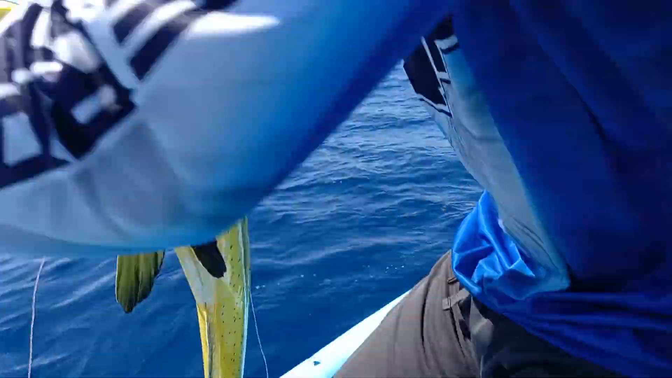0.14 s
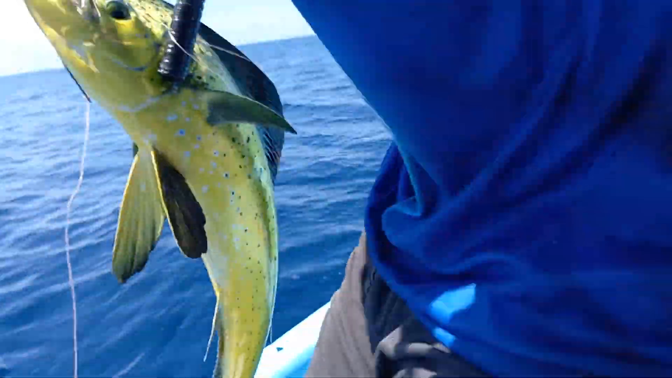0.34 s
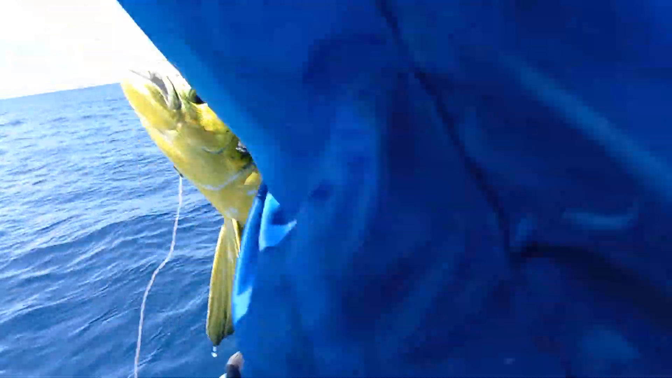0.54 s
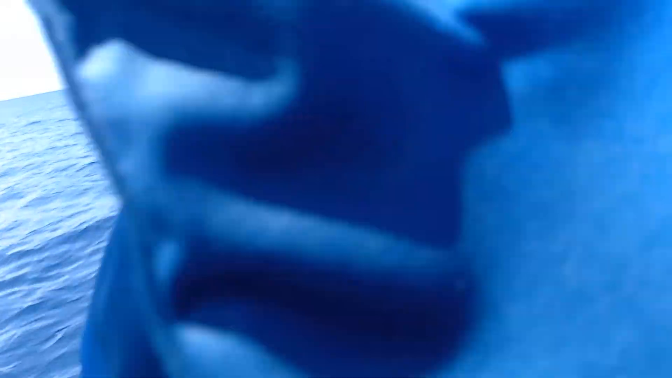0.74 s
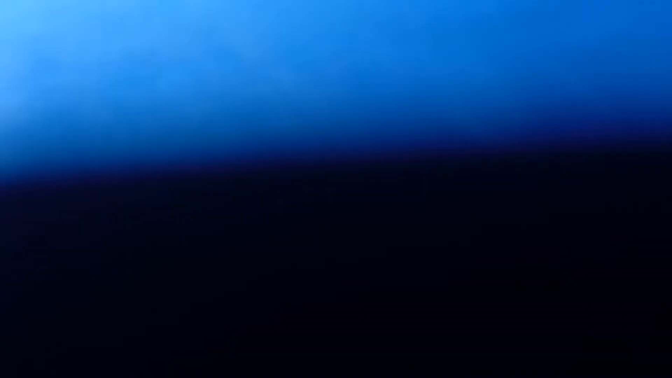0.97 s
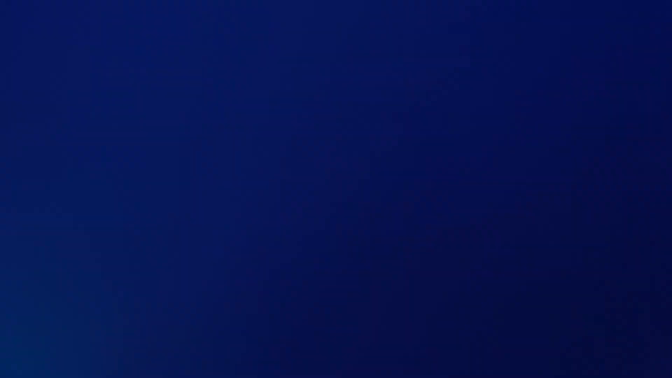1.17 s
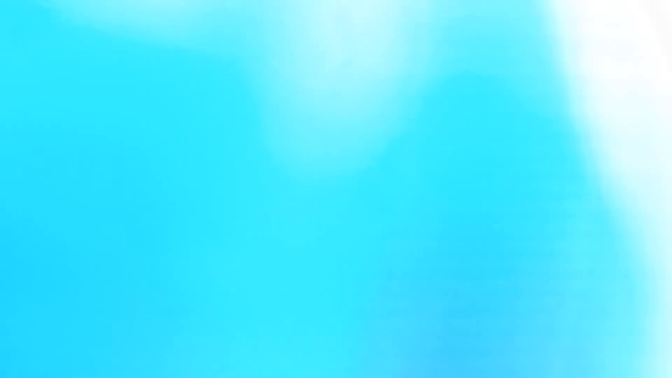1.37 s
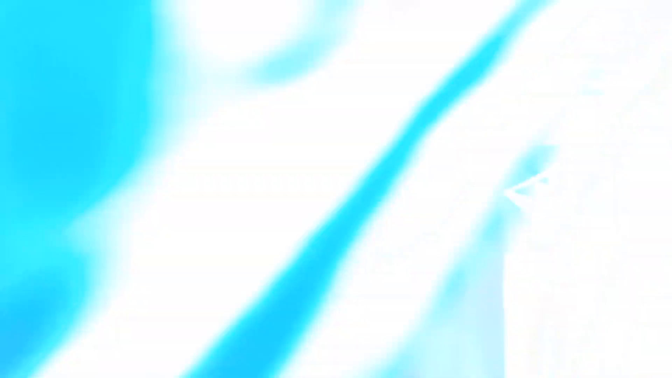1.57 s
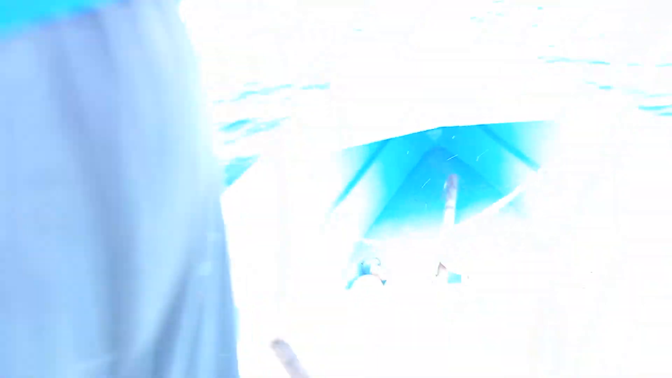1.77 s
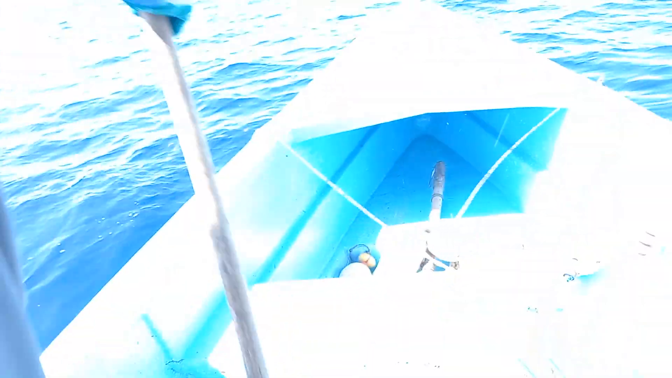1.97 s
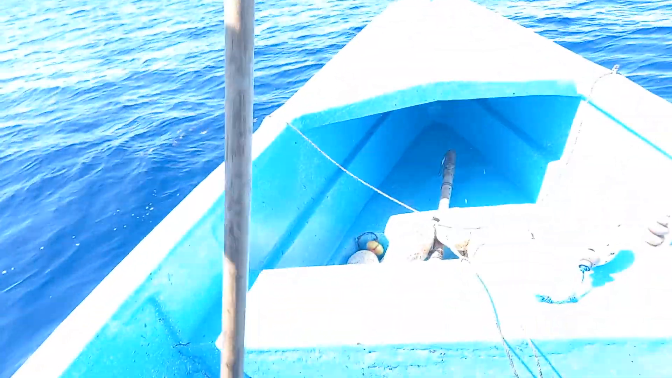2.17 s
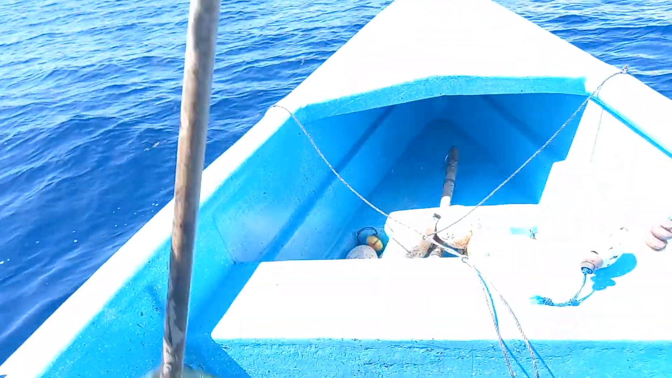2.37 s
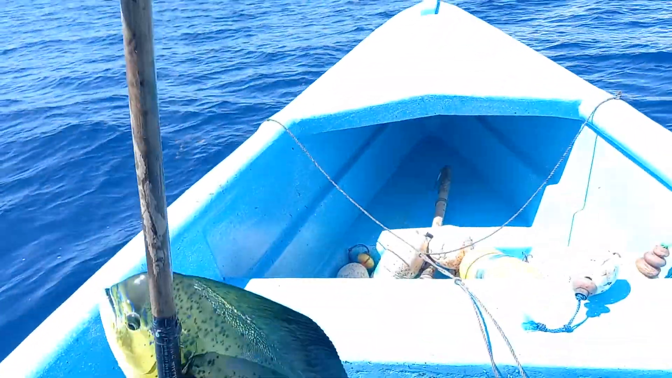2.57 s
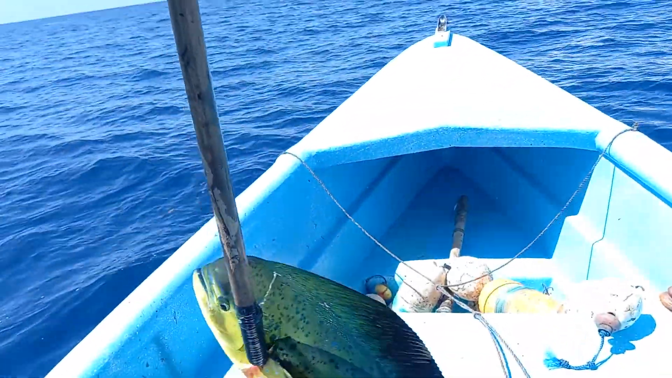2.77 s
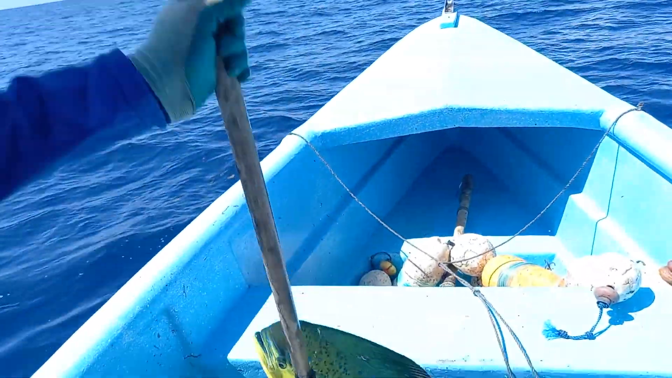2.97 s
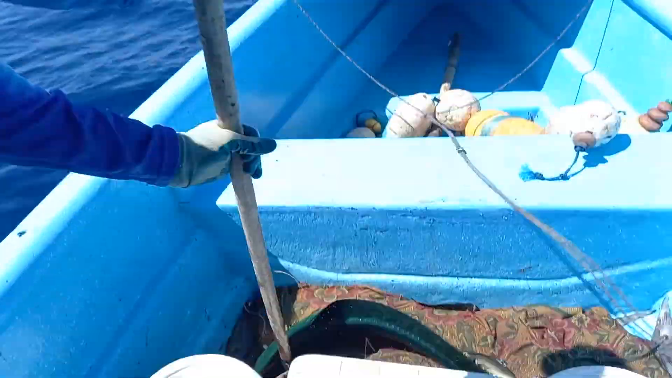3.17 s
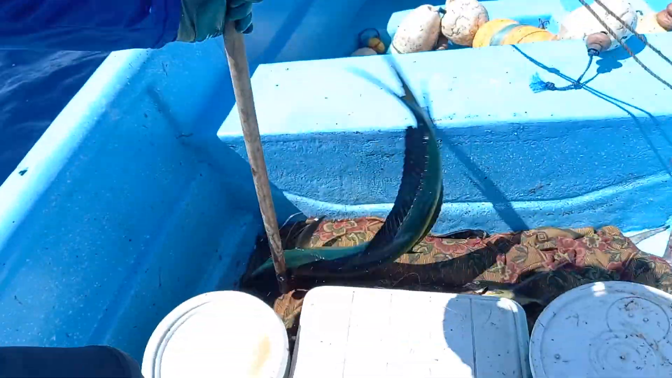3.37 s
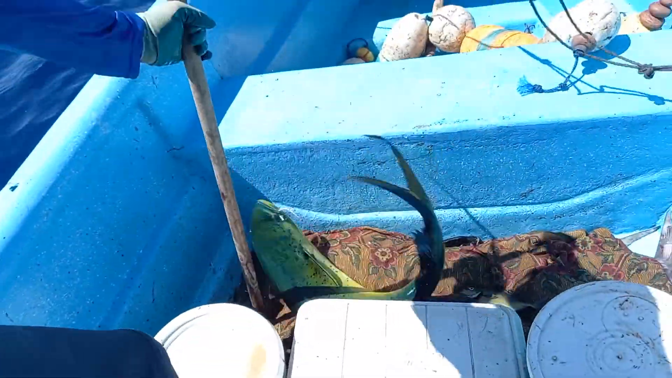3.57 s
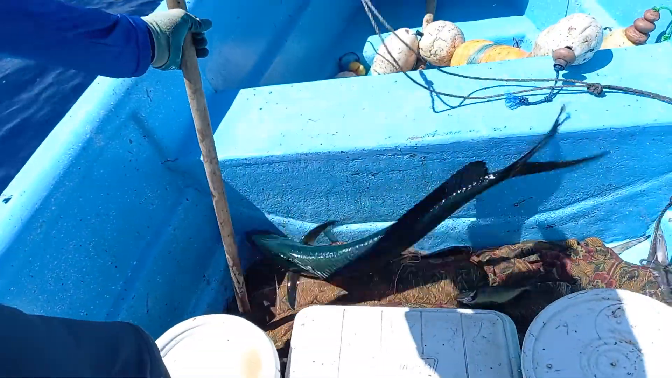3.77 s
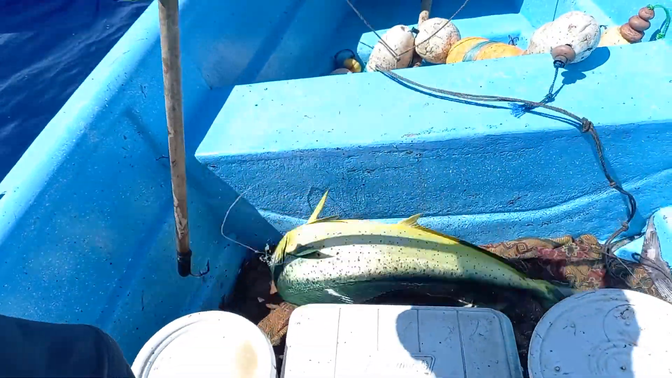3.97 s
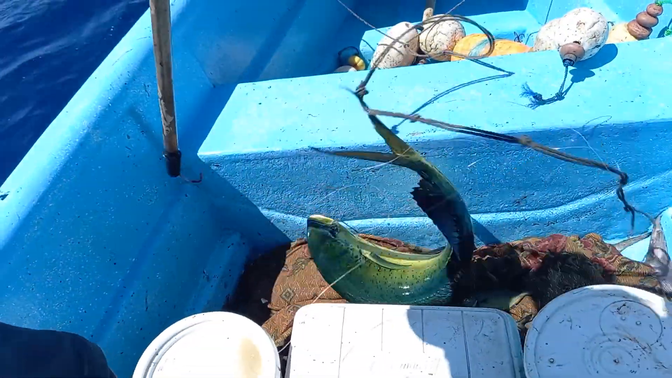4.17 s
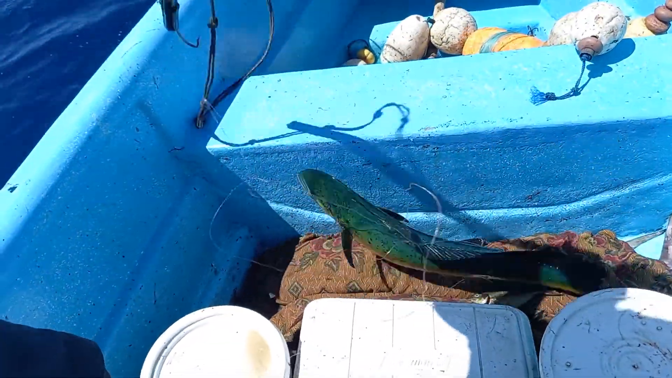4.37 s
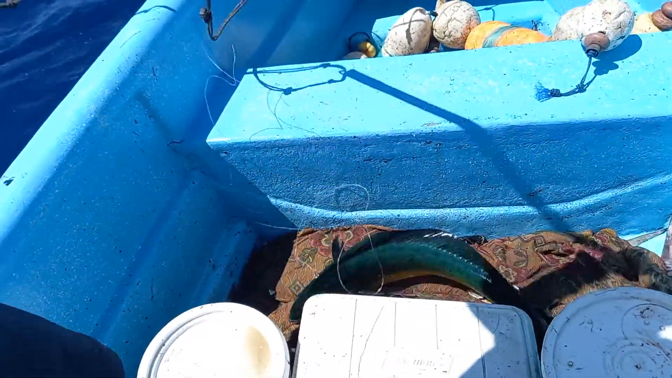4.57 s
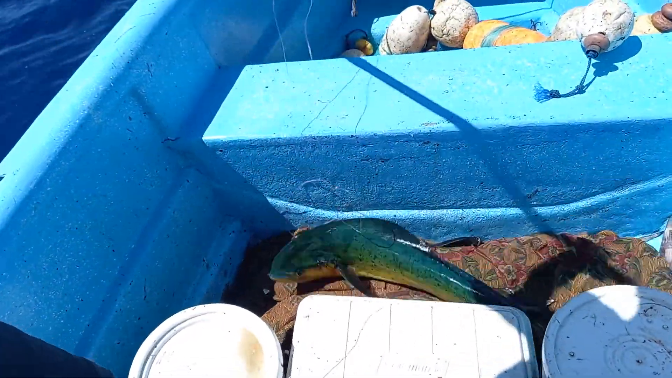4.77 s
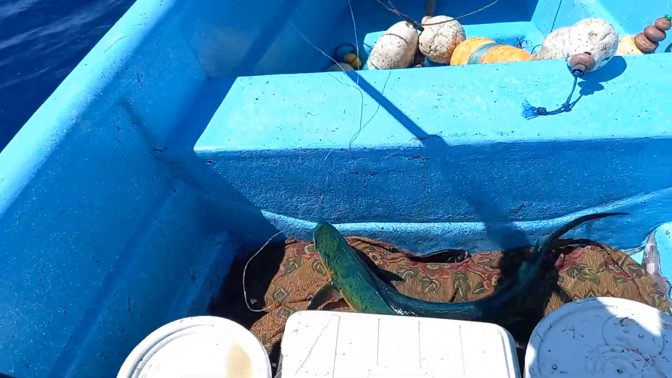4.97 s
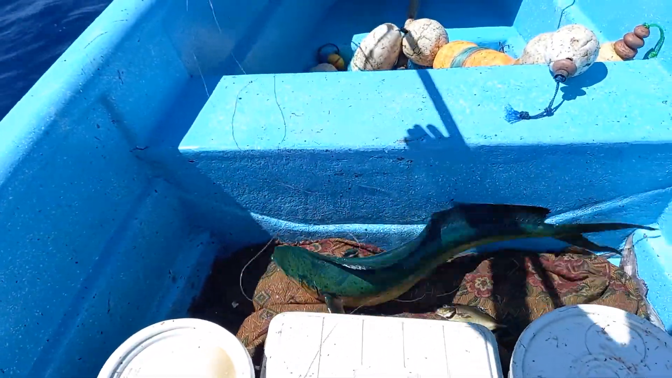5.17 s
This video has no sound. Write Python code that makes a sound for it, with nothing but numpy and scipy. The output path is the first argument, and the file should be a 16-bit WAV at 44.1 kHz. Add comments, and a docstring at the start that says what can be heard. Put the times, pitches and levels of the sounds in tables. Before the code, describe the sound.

A large fish is brought into a small open fibreglass boat, heard closely just ahead and slightly to the right. For the first second it is nearly quiet: faint hull rumble, light rustle and one weak slap with a knock near 0.3 s. At about 1.2 s a solid hollow knock lands, followed by scuffing sleeves and rope, cloth brushing the microphone and small wet slaps until 1.8 s. Low thumps and sharp slaps fall around 1.9-2.3 s, then lighter ones near 2.6-2.9 s over a soft rumble. From 3.1 s the fish thrashes hard: dense, irregular wet cracks of tail and flank, low floor booms and short ringing panel knocks, several per second, with fierce bursts around 3.5-4.0 s. After a slight easing near 4.1-4.2 s, strong blows resume from 4.4 s until the end, past 5.2 s, with slithering, wet crackle and hull shudder between them.

```python
"""In a small open fibreglass boat, a big fish is hauled over the side and thrashes on the floor.
Wet slaps of skin and tail are bursts of flickering noise with a short ring of trapped air.
The body's blows make the hull boom and the side panels ring: sums of dying sine waves.
Around the blows, coloured noise makes the hull rumble, sleeves and rope rub, clothes rustle by
the microphone and the fish slither and crackle wetly on a mat."""
import sys
import numpy as np
from scipy import signal
from scipy.fft import rfft, irfft
from scipy.io import wavfile
from scipy.ndimage import uniform_filter1d

SR = 44100
rng = np.random.default_rng(int(sys.argv[2]) if len(sys.argv) > 2 else 0)


def int16_out(signal):
    """Quantize to a 16-bit WAV file."""
    q = np.round(np.clip(np.atleast_2d(signal).T, -1, 1) * 32767)
    wavfile.write(sys.argv[1], SR, q.astype(np.int16))


N = 231014

# Levels in these tables are starting points: the functions add fixed trims in dB when they mix.
# Hauling the fish aboard, joined by straight lines:
# (time [s], hull rumble level [dB], rubbing level [dB], rustle level [dB])
HAULING = [(0.0, -50, -55.5, -65), (0.13, -60, -67, -66), (0.38, -94, -60, -75), (0.52, -59.5, -103, -67),
           (1.06, -59.5, -56.5, -64), (1.21, -57, -32, -57), (1.31, -63, -36, -43), (1.38, -58, -35.5, -79),
           (1.51, -47.5, -35.5, -49), (1.62, -76, -40.5, -44), (1.75, -48, -27.5, -50.5),
           (1.9, -40.5, -42, -50), (2.06, -41, -29.5, -48), (2.2, -44, -80, -61), (2.45, -67, -45, -67),
           (2.71, -38.5, -58, -53), (2.88, -47, -63, -57), (3.08, -81, -53, -55.5)]
# Colours of the movement noises: (frequency [Hz], level [dB])
RUMBLE_COLOUR = [(15, -5), (40, -35.5), (62, 5), (84, 6.5), (130, -1.5), (200, -11), (900, -44)]
RUBBING_COLOUR = [(100, -19.5), (220, -8), (330, 2), (500, -0.5), (750, -11), (1400, -24), (2500, -27.5),
                  (6000, -91)]
RUSTLE_COLOUR = [(500, -15), (1200, 11.5), (2200, 2.5), (4000, 4), (6500, 4), (12000, -0.5), (16000, -1.5)]
# Clothes sweep across the microphone: (time [s], level [dB], length [s])
CLOTH_SWEEPS = [(0.62, -58, .2), (1.003, -52, .15), (1.225, -38, .035), (1.295, -43, .025), (1.50, -46, .1),
                (1.755, -44, .07), (2.41, -53, .09), (2.87, -47, .07)]
# Short scuffs of sleeves and rope along the hull: (time [s], level [dB], pitch [Hz], length [s])
HULL_SCUFFS = [(0.629, -45, 480, 0.13), (0.741, -46, 1560, 0.034), (0.781, -60, 1890, 0.063),
               (1.045, -40.5, 417, 0.087), (1.515, -26.5, 910, 0.06), (1.755, -30.5, 1250, 0.078),
               (2.481, -41.5, 1140, 0.085), (2.769, -35, 710, 0.063), (3.306, -39.5, 2280, 0.059)]
# Blows of the body on the hull; a low pitch is the floor, a high one the side panels:
# (time [s], level [dB], strongest pitch [Hz])
BODY_BLOWS = [(0.089, -49.5, 86), (0.325, -29.5, 714), (0.369, -32.5, 90), (0.434, -60, 94),
              (0.772, -38, 85), (1.164, -11.5, 323), (1.176, -9, 480), (1.189, -10.5, 84),
              (1.683, -25, 215), (1.731, -23.5, 334), (1.926, -13, 83.4), (2.032, -16, 108),
              (2.214, -27.5, 543), (2.287, -16.5, 90.5), (2.291, -46, 474), (2.725, -28, 347),
              (3.092, -16, 407), (3.11, -4, 340), (3.134, -9, 92), (3.213, -14.5, 93.5), (3.382, -20, 117),
              (3.485, -8.5, 420), (3.615, -12.5, 171), (3.666, -2.5, 130), (3.689, -7.5, 96),
              (3.75, -12.5, 132), (3.775, -7.5, 104), (3.83, -25, 88), (3.923, -8.5, 160),
              (3.942, -8.5, 96), (3.974, -14.5, 145), (3.994, -17.5, 220), (4.052, -21, 86),
              (4.272, -20.5, 96), (4.32, -22, 282), (4.399, -5.5, 124), (4.506, -12.5, 324),
              (4.517, -5, 165), (4.533, -27, 129), (4.615, -17.5, 294), (4.703, -5.5, 116),
              (4.782, -5.5, 120), (4.901, -6, 104), (4.923, -14, 323), (4.977, -11, 327),
              (5.029, -5.5, 117), (5.134, -10, 126), (5.201, -3, 126)]
# Natural tones of the whole floor bending: (frequency [Hz], level [dB], time to fall 60 dB [s])
FLOOR_TONES = [(71.5, -25.5, 0.3), (83.3, 7, 0.12), (92.6, 1.5, 0.41), (110.7, 3.5, 0.084),
               (135.2, -1.5, 0.19), (169.4, 3.5, 0.068)]
# Natural tones of the side panels and the seat: (frequency [Hz], level [dB], time to fall 60 dB [s])
PANEL_TONES = [(196, -4, 0.13), (234.3, -3.5, 0.14), (276.3, -10, 0.33), (327.2, 0, 0.13),
               (397.4, 1.5, 0.068), (433.3, 0.5, 0.12), (503, -4, 0.11), (566.5, -2, 0.14),
               (655.6, -4, 0.094), (721, -6.5, 0.11), (894, -5.5, 0.18)]
# Wet slaps; brightness below 0 is the fleshy flank, above 0 the thin tail:
# (time [s], crack level [dB], brightness [dB], pitch of the trapped air [Hz], contact time [s])
WET_SLAPS = [(0.322, -26.5, -4, 3400, 0.0017), (1.1794, -19.5, -15, 2470, 0.026),
             (1.239, -24, 7, 2920, .004), (1.257, -26.5, 12, 6400, 0.0035),
             (1.3118, -25.5, 11, 2800, 0.0037), (1.3865, -29.5, 0, 2680, 0.014),
             (1.482, -34, -29, 3920, 0.028), (1.523, -25.5, -22, 3220, 0.013),
             (1.6817, -19.5, -2, 2700, 0.0082), (1.734, -25, -16, 2470, 0.0024),
             (1.927, -21.5, 6, 5970, 0.0012), (2.0301, -19, 1.5, 6400, 0.0014),
             (2.2129, -37.5, -20, 2900, 0.0052), (2.3176, -37, 15.5, 4240, .003),
             (2.589, -31.5, 7, 4570, 0.0056), (2.6494, -23.5, -0.5, 4330, 0.0037),
             (2.7245, -18, -7.5, 3300, .01), (2.8529, -25, 3.5, 2900, 0.0045),
             (2.99, -43.5, 19, 6000, 0.0058), (3.0927, -23, 2.5, 6360, 0.0011),
             (3.1184, -16.5, -15, 2390, 0.0012), (3.1374, -19, 0.5, 2350, 0.00068),
             (3.1931, -18.5, -0.5, 2300, 0.0096), (3.2115, -13.5, 6.5, 5750, 0.0024),
             (3.2817, -22, 13, 6100, 0.0096), (3.302, -18, 7, 2010, 0.0015),
             (3.3823, -24, 15.5, 2050, 0.0014), (3.4136, -25.5, -13.5, 2120, 0.0071),
             (3.4707, -16, 4.5, 4140, 0.027), (3.53, -16.5, 13.5, 5200, .006),
             (3.5395, -14, 10.5, 2280, 0.0014), (3.6524, -23, -22, 2610, 0.015),
             (3.6654, -17.5, 3.5, 1920, 0.022), (3.7733, -7.5, 10, 6930, 0.0021),
             (3.8013, -12.5, -7.5, 2020, 0.0045), (3.902, -18.5, -9.5, 2150, 0.0033),
             (3.9236, -18, -8, 3700, 0.006), (3.9703, -14, 2, 2440, 0.012), (3.9949, -14, 9.5, 4980, .007),
             (4.0208, -19.5, 7.5, 2110, 0.0041), (4.1013, -30, 7.5, 6200, 0.017),
             (4.16, -32.5, -18, 2120, 0.012), (4.1981, -22, 6.5, 2100, 0.0037),
             (4.2673, -18, 15, 5850, 0.0019), (4.3207, -17, 11.5, 6270, 0.0026),
             (4.3924, -11.5, 2, 3300, 0.0074), (4.4858, -14, 13.5, 6300, 0.0028),
             (4.5061, -18, -8, 2350, 0.0042), (4.58, -24.5, 1, 6100, .006),
             (4.6122, -11.5, -2, 6600, 0.0073), (4.6274, -17, 17.5, 6800, 0.0075),
             (4.7007, -12.5, 11.5, 6340, 0.0042), (4.778, -21.5, -18, 2680, .0055),
             (4.811, -8.5, 6, 2060, 0.0017), (4.8435, -21, 2, 2620, .003), (4.9197, -14, 9.5, 4550, 0.006),
             (4.9756, -16, 11.5, 4900, 0.0032), (5.0283, -19, -7, 2830, 0.0014),
             (5.1165, -9.5, -1.5, 3950, 0.0018), (5.2014, -11, 9, 2100, 0.0076)]
# Colour of the recorder: (frequency [Hz], level [dB])
RECORDER_COLOUR = [(1450, -1.5), (1800, -3.5), (2100, 4.5), (5000, 4.5), (6700, 5), (7400, -6.5),
                   (8200, -6.5), (9500, -2.5), (12000, -1.5), (15000, -7)]

BLOW_TIME = np.arange(SR // 3) / SR   # seconds since a blow landed

# After every blow the hull shudders and the fish slides on the mat; slaps make it slither.
# Levels against the blow, before trims.
SHUDDER_DB, SHUDDER_T60_S = -21, 0.71
SLIDE_DB, SLIDE_T60_S = -28.5, 1
SLITHER_DB, SLITHER_T60_S = -38, 0.51
BRUSH_GAIN_DB, BRUSH_ATTACK_S, BRUSH_RELEASE_S = -4, 0.0052, 0.01

# Below the crossover a blow bends the floor and the panels answer higher up; above it they swap roles.
CROSSOVER_HZ, PANEL_OVER_BOOM = 200, 2.19   # the second is a ratio of pitches
FLOOR_BLOW_PANEL_DB, SIDE_BLOW_PANEL_DB, SIDE_BLOW_BOOM_DB = -11.5, -4, -13

# The brighter the slap, the more spray and the less smack: level against the crack before trims,
# and change in dB per dB of brightness.
SPRAY_DB, SPRAY_SLOPE = -16, 0.88
SMACK_DB, SMACK_SLOPE = -6, 0.35
# Each slap rings the panel under it (level against the smack), and the skin comes down once more.
SLAP_RING_DB, SLAP_RING_LOW_HZ, SLAP_RING_HIGH_HZ = -2, 246, 407
REBOUND_S, REBOUND_DB = 0.027, -21   # typical delay; level against the slap


def from_db(db):
    """Turn decibels into a gain."""
    return 10 ** (np.asarray(db) / 20)


def rms_one(x):
    """Scale a sound to an average (rms) strength of 1."""
    return x / np.sqrt(np.mean(x ** 2) + 1e-20)


def crest_one(x, size):
    """Scale a stereo sound so that its loudest stretch of this many samples has rms 1."""
    power = uniform_filter1d(np.mean(x ** 2, axis=0), size, mode="constant")
    return x / np.sqrt(power.max() + 1e-20)


def add(out, s, sound):
    """Mix a sound in from time s on."""
    start = max(int(s * SR), 0)
    part = out[:, start:start + sound.shape[1]]
    part += sound[:, :part.shape[1]]


def band(x, low_hz, high_hz, order=2):
    """Keep mainly the pitches between two limits."""
    return signal.sosfilt(signal.butter(order, [low_hz, high_hz], "band", fs=SR, output="sos"), x)


def coloured(x, spectrum):
    """Filter through the (frequency, level) points with minimum phase: nothing sounds early."""
    size = 8192
    hz, db = np.transpose(spectrum)
    grid = np.maximum(np.fft.rfftfreq(size, 1 / SR), 1)
    gain = from_db(np.interp(np.log(grid), np.log(hz), db))
    # folding the cepstrum (spectrum of the log gain) forward puts the response after time zero
    cepstrum = irfft(np.log(gain))[:size // 2]
    cepstrum[1:] *= 2
    response = irfft(np.exp(rfft(cepstrum, size)))[:size // 2]
    return signal.fftconvolve(x, response[None], axes=1)[:, :x.shape[1]]


def flicker(per_s, size):
    """Random values of spread 1, this many a second, joined by straight lines."""
    values = rng.standard_normal(size)
    return np.interp(np.arange(size) * per_s / SR, np.arange(size), values)


def stereo_noise(likeness, size):
    """White noise whose left and right are alike by this much (1 is identical)."""
    mid, side = rng.standard_normal((2, size))
    shared = np.sqrt((1 + likeness) / 2) * mid
    opposed = np.sqrt((1 - likeness) / 2) * side * [[1], [-1]]
    return shared + opposed


def dying(t60):
    """Loudness curve that falls 60 dB in t60 seconds."""
    return np.exp(-np.log(1000) * BLOW_TIME / t60)


def glance(x, share):
    """The nearest panel returns the sound within 2 ms, differently to each ear, hollowing its colour."""
    lags = (rng.uniform(0.0004, 0.002, 2) * SR).astype(int)
    returned = [np.pad(ear, (lag, 0))[:len(ear)] for ear, lag in zip(x, lags)]
    return x + share * np.array(returned)


def friction(spectrum, likeness, grain_db, grains_per_s, sway_db):
    """Uneven sticking and slipping: noise in clumps, coloured by what is rubbed."""
    grains = grain_db * flicker(grains_per_s, N)
    sway = sway_db * flicker(45, N)
    clumps = from_db(grains + sway)
    return rms_one(coloured(stereo_noise(likeness, N) * clumps, spectrum))


def stirred(blows, t60):
    """Motion left by the blows: each adds its energy, which then dies away."""
    s, db = np.transpose(blows)[:2]
    energy = np.zeros(N)
    energy[(s * SR).astype(int)] = from_db(db) ** 2
    keep = np.exp(-2 * np.log(1000) / (t60 * SR))   # share of energy left after one sample
    return np.sqrt(signal.lfilter([1], [1, -keep], energy))


def brushes():
    """Level of cloth on the microphone: each sweep rises, holds and lets go."""
    t = np.arange(N) / SR
    level = np.zeros(N)
    for s, db, length in CLOTH_SWEEPS:
        rise = np.clip((t - s) / BRUSH_ATTACK_S, 0, 1)
        release = np.clip(1 - (t - s - length) / BRUSH_RELEASE_S, 0, 1)
        level += from_db(db) * rise * release
    return level


def crackle(per_s, size_db):
    """Single ticks of fins and flung drops: many small, a few large."""
    sizes = from_db(size_db * np.minimum(rng.exponential(1, N), np.pi))
    happens = rng.random(N) < per_s / SR
    ticks = happens * sizes * rng.standard_normal((2, N))
    return rms_one(coloured(glance(ticks, share=1.0), RUSTLE_COLOUR))


def movement():
    """Feet and water stir the hull, sleeves and rope rub; after blows the fish slides and crackles."""
    s, *columns = np.transpose(HAULING)
    rumble, rubbing, rustle = [from_db(np.interp(np.arange(N) / SR, s, c)) for c in columns]
    # independent noises add by energy
    rumble = np.hypot(rumble, from_db(SHUDDER_DB) * stirred(BODY_BLOWS, SHUDDER_T60_S))
    rubbing = np.hypot(rubbing, from_db(SLIDE_DB) * stirred(BODY_BLOWS, SLIDE_T60_S))
    rustle = rustle + from_db(BRUSH_GAIN_DB) * brushes()
    slither = from_db(SLITHER_DB) * stirred(WET_SLAPS, SLITHER_T60_S)

    hull = friction(RUMBLE_COLOUR, likeness=0.62, grain_db=-1.5, grains_per_s=25, sway_db=0.8)
    rub = friction(RUBBING_COLOUR, likeness=0.72, grain_db=6.0, grains_per_s=250, sway_db=2.0)
    cloth = friction(RUSTLE_COLOUR, likeness=0.02, grain_db=2.5, grains_per_s=1100, sway_db=4.6)
    skin = friction(RUSTLE_COLOUR, likeness=0.02, grain_db=4.5, grains_per_s=740, sway_db=10.0)
    wet = skin + from_db(11) * crackle(per_s=210, size_db=6)
    return (from_db(3.0) * rumble * hull
            + from_db(0.44) * rubbing * rub
            + from_db(0.9) * rustle * cloth
            + slither * wet)


def scuffs():
    """A short rub, noise in one broad band of pitch, swells and dies away."""
    out = np.zeros((2, N))
    for s, db, hz, length in HULL_SCUFFS:
        age = BLOW_TIME / (0.27 * length)   # 1 at the loudest moment
        swell = (age * np.exp(1 - age)) ** 2
        rub = rms_one(band(stereo_noise(0.6, len(BLOW_TIME)), hz / 1.5, hz * 1.185))
        add(out, s, from_db(db) * rub * swell)
    return out


def struck(modes, strongest_hz, focus_db, contact, spread, detune):
    """The spot hit favours tones near one pitch (focus in dB per octave); the fish's weight detunes them."""
    hz, db, t60 = np.transpose(modes)[:, :, None]
    strength, load, width, turn = rng.standard_normal((4, len(modes), 1))
    octaves_away = np.abs(np.log2(hz / strongest_hz))
    gain = from_db(db + 3.8 * strength - focus_db * octaves_away)
    phase = 2 * np.pi * hz * (1 + detune * load) * BLOW_TIME + 1.126 * turn
    envelope = gain * dying(t60) * (1 - np.exp(-BLOW_TIME / contact))
    # each tone reaches the two ears of the microphone slightly out of step
    ears = [np.sum(envelope * np.sin(phase + side * spread * width), axis=0) for side in (1, -1)]
    return np.array(ears)


def panel_ring(panel_hz):
    """A struck side panel rings; loose gear rattles along as a dying noise."""
    panel = struck(PANEL_TONES, panel_hz, focus_db=11, contact=0.00064, spread=0.11, detune=0.04)
    panel = band(panel, 164, 2500)
    rattle = band(stereo_noise(0.32, len(BLOW_TIME)) * dying(0.27), panel_hz / 2, panel_hz * 2)
    return crest_one(panel, size=512) + from_db(-14.5) * crest_one(rattle, size=512)


def smack_level(crack_db, brightness_db):
    """The fleshy flank smacks more than the tail; in dB."""
    return crack_db + SMACK_DB - SMACK_SLOPE * brightness_db


def knocks():
    """The body's weight bends the floor and rings the panels; the slaps ring them lightly too."""
    out = np.zeros((2, N))
    for s, db, hz in BODY_BLOWS:
        if hz < CROSSOVER_HZ:
            boom_db, boom_hz = db, hz
            panel_db, panel_hz = db + FLOOR_BLOW_PANEL_DB, hz * PANEL_OVER_BOOM
        else:
            boom_db, boom_hz = db + SIDE_BLOW_BOOM_DB, hz / PANEL_OVER_BOOM
            panel_db, panel_hz = db + SIDE_BLOW_PANEL_DB, hz
        boom = struck(FLOOR_TONES, boom_hz, focus_db=18, contact=0.0019, spread=0.054, detune=0.025)
        # keep the boom's body, with little below 109 Hz
        boom = crest_one(band(boom, 109, 710, order=3), size=768)
        add(out, s, from_db(boom_db - 5) * boom + from_db(panel_db + 2.0) * panel_ring(panel_hz))
    for s, crack_db, brightness_db, *_ in WET_SLAPS:
        ring = panel_ring(rng.uniform(SLAP_RING_LOW_HZ, SLAP_RING_HIGH_HZ))
        add(out, s, from_db(smack_level(crack_db, brightness_db) + SLAP_RING_DB) * ring)
    return out


def splat(contact, grain_db, bounce_db, bounce_t60, scatter_db):
    """Dense tiny wet impacts as skin lands, quick bounces off the panels, then scatter in the boat."""
    size = len(BLOW_TIME)
    # the first flat touch snaps; the rest of the skin rolls on after it
    touch = np.exp(-BLOW_TIME / contact) + from_db(-6.0) * dying(t60=0.0047)
    landing = touch * from_db(grain_db * flicker(1850, size))
    echoes = from_db(bounce_db) * dying(bounce_t60) + from_db(scatter_db) * dying(t60=0.063)
    envelope = landing + echoes * from_db(1.1 * flicker(300, size))
    onset = 1 - np.exp(-BLOW_TIME / 0.00047)
    return glance(rng.standard_normal((2, size)) * envelope * onset, share=0.87)


def air_pocket(x, hz, width_hz, boost):
    """Air squeezed out from under the skin rings briefly: a narrow resonance is added."""
    b, a = signal.iirpeak(hz, hz / width_hz, fs=SR)
    return x + boost * signal.lfilter(b, a, x)


def slaps():
    """Each slap is a hollow smack, a bright crack and a fine spray, then a weak second landing."""
    out = np.zeros((2, N))
    for s, crack_db, brightness_db, pocket_hz, contact in WET_SLAPS:
        hollow_hz = rng.uniform(970, 1825)
        rebound_s = REBOUND_S * rng.uniform(0.8, 1.2)
        smack_db = smack_level(crack_db, brightness_db)
        spray_db = crack_db + SPRAY_DB + SPRAY_SLOPE * brightness_db
        smack = splat(contact, grain_db=1, bounce_db=-2.0, bounce_t60=0.13, scatter_db=-18.5)
        crack = splat(contact, grain_db=0.5, bounce_db=-10, bounce_t60=0.087, scatter_db=-23)
        spray = splat(contact, grain_db=2.5, bounce_db=-6.5, bounce_t60=0.059, scatter_db=-30)
        smack = air_pocket(band(smack, 520, 1575, order=3), hollow_hz, width_hz=115, boost=1.54)
        crack = air_pocket(band(crack, 1110, 7270, order=3), pocket_hz, width_hz=345, boost=2.14)
        spray = band(spray, 6100, 21550, order=3)
        slap = (from_db(smack_db - 0.32) * crest_one(smack, size=256)
                + from_db(crack_db - 7.5) * crest_one(crack, size=128)
                + from_db(spray_db + 5.5) * crest_one(spray, size=128))
        add(out, s, slap)
        # the second landing has left and right swapped
        add(out, s + rebound_s, from_db(REBOUND_DB) * slap[::-1])
    return out


def scene():
    """Everything happens just ahead, a little to the right."""
    balance = from_db(0.51 * np.array([[-1], [1]]))   # left softer, right louder
    return (movement() + scuffs() + knocks() + slaps()) * balance


def record(dry):
    """The recorder colours the sound, the loudest peaks are rounded, the top is cut."""
    heard = coloured(dry, RECORDER_COLOUR)
    rounded = heard / (1 + heard ** 6) ** (1 / 6)
    top_cut = signal.ellip(10, 0.2, 80, 16000, fs=SR, output="sos")   # low-pass at 16000 Hz
    return signal.sosfilt(top_cut, rounded)


dry = scene()
out = record(dry)
int16_out(out)
```